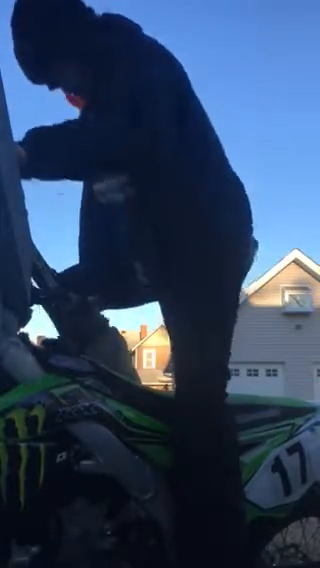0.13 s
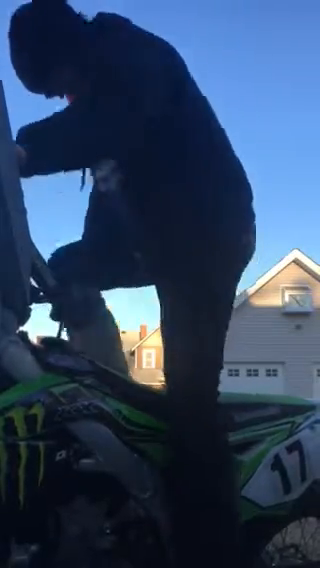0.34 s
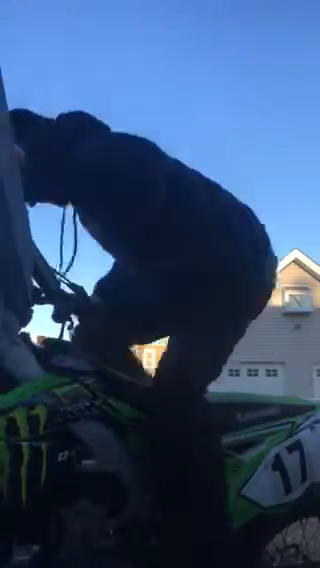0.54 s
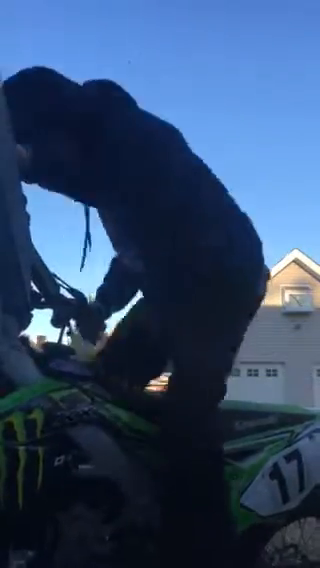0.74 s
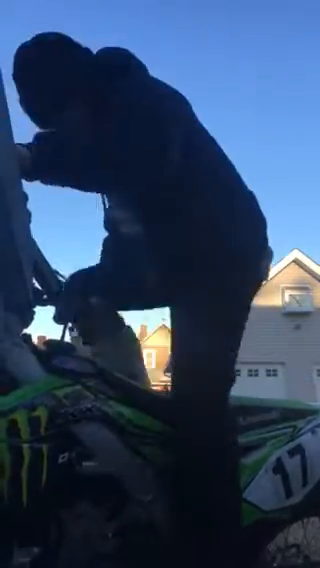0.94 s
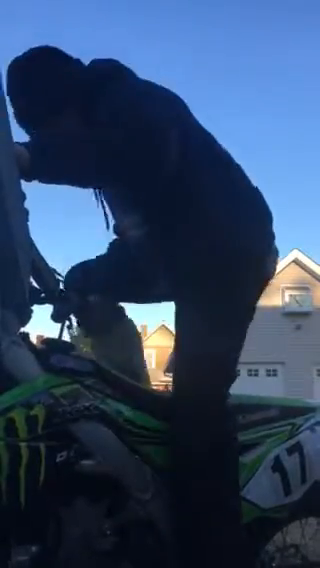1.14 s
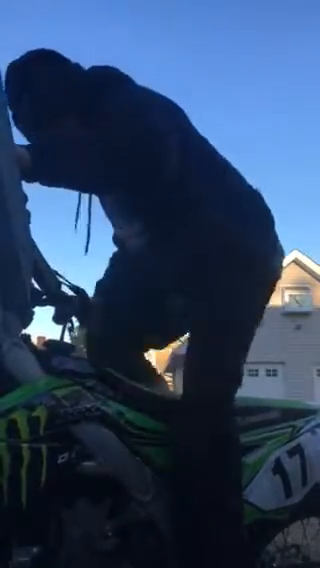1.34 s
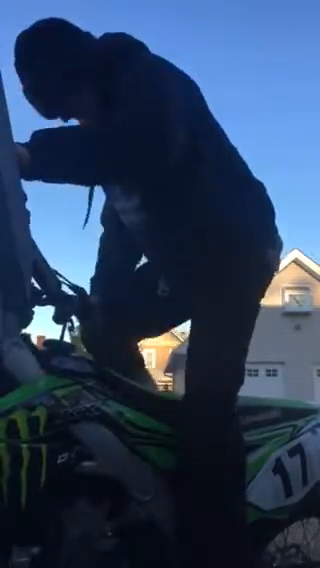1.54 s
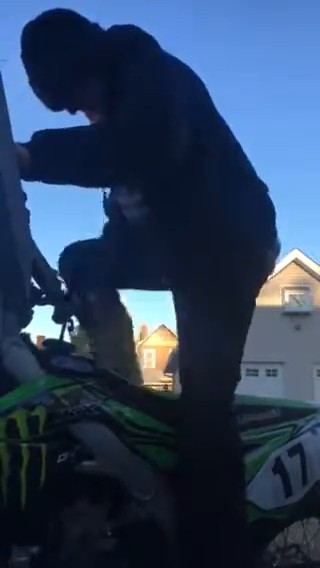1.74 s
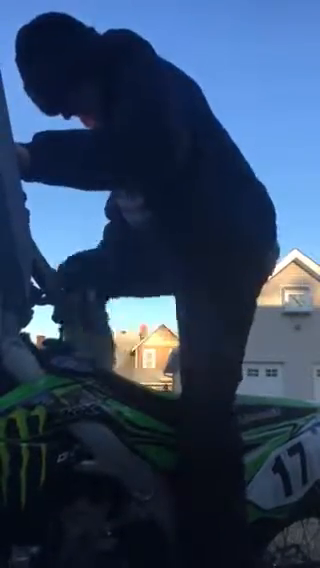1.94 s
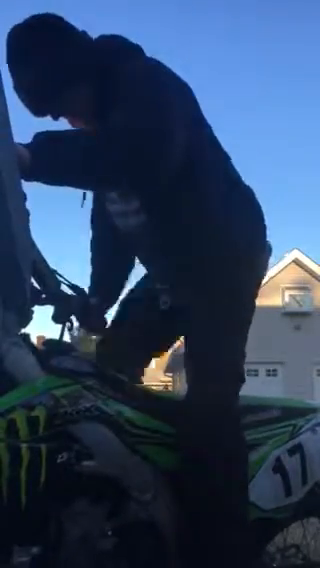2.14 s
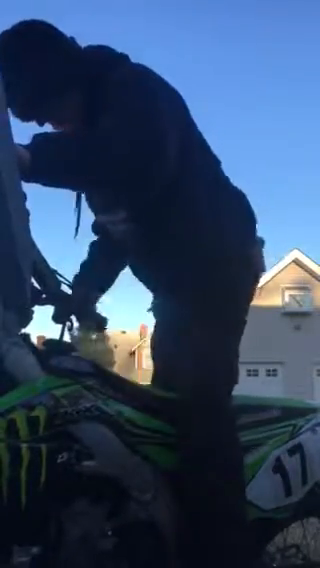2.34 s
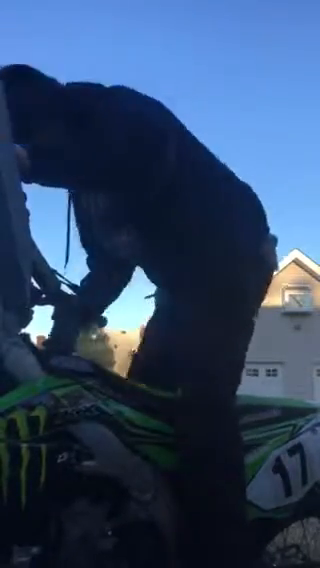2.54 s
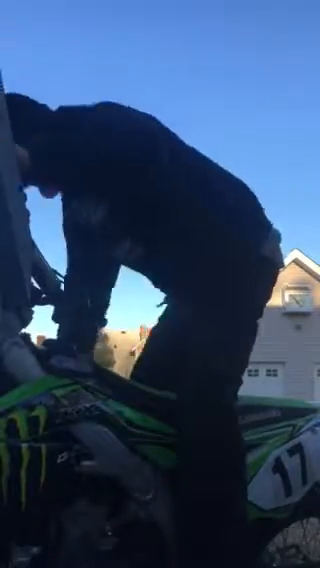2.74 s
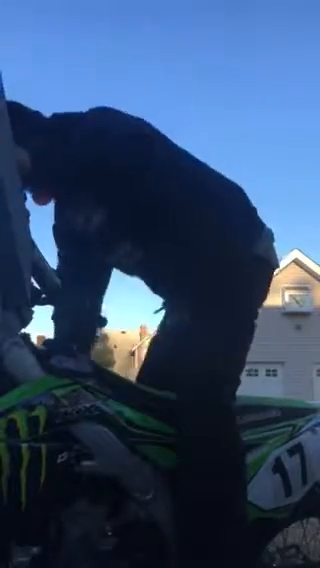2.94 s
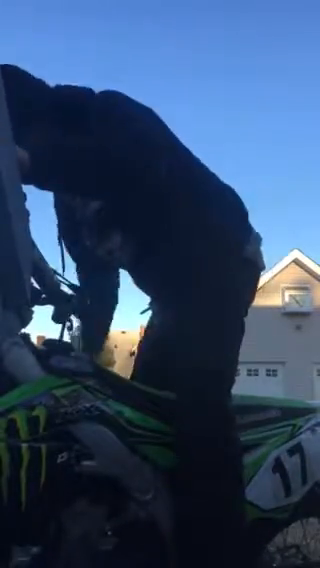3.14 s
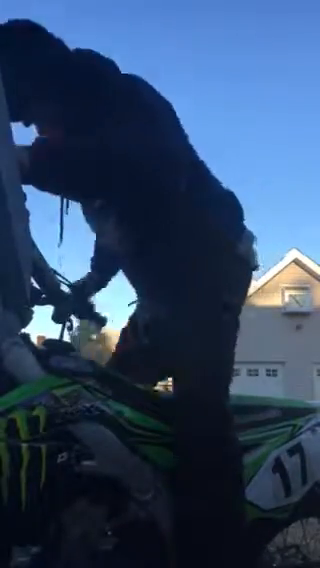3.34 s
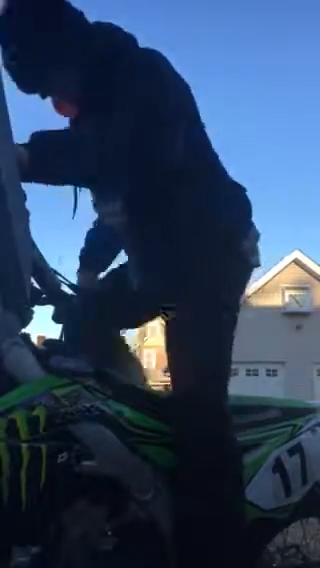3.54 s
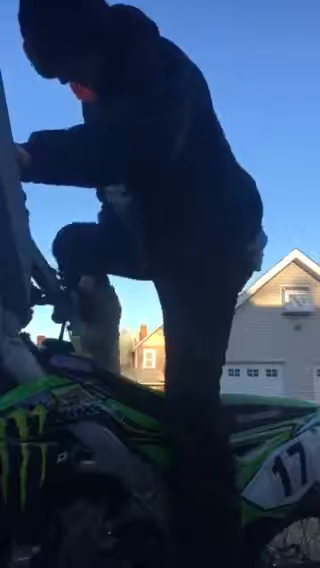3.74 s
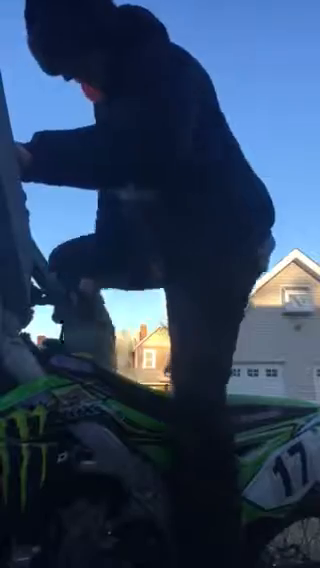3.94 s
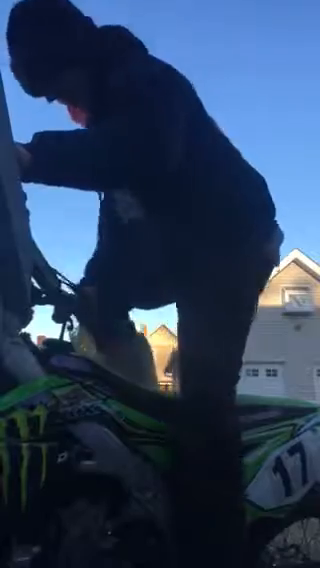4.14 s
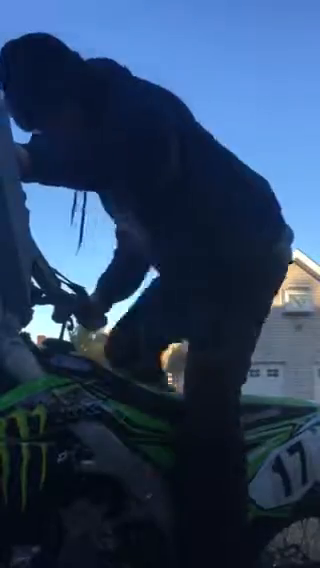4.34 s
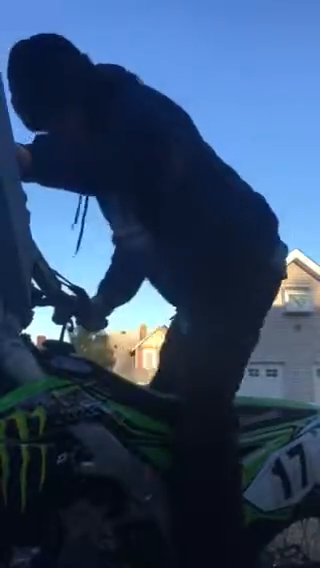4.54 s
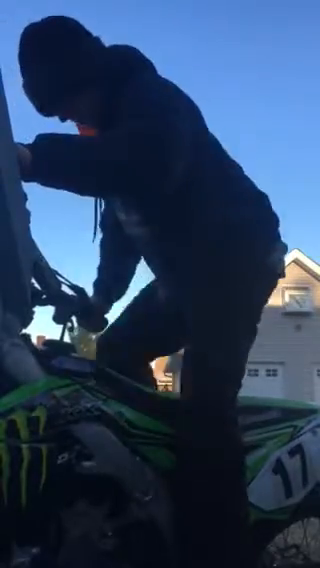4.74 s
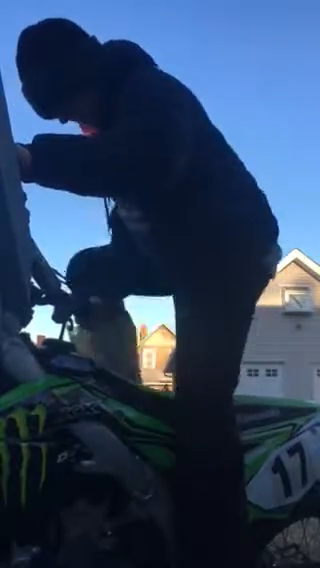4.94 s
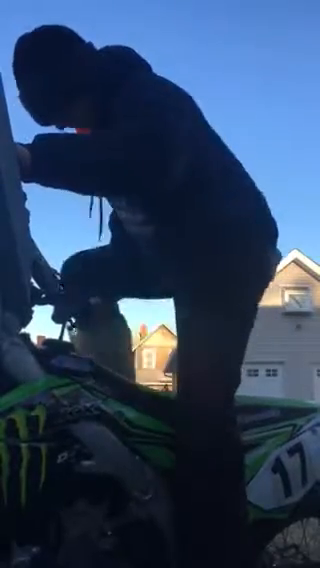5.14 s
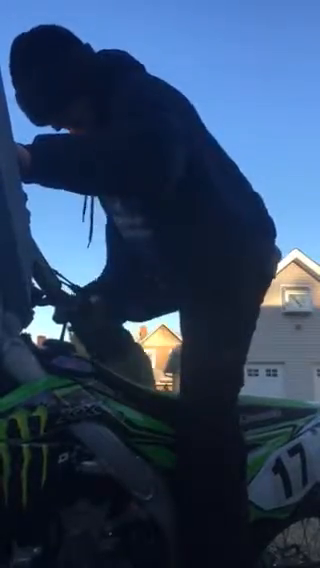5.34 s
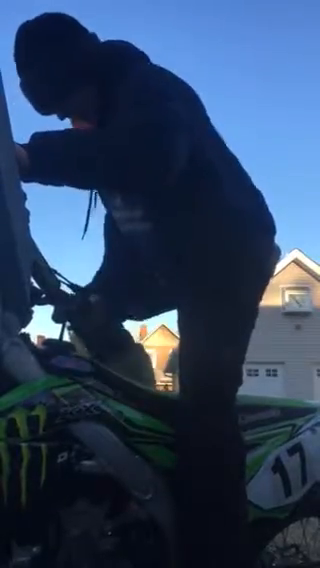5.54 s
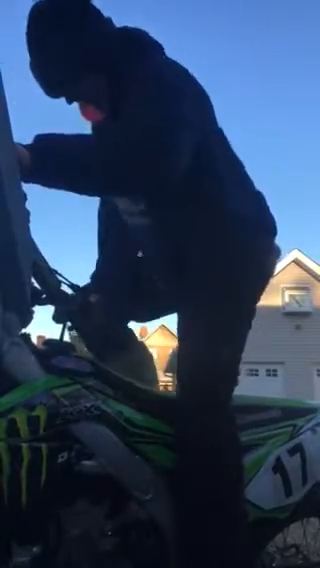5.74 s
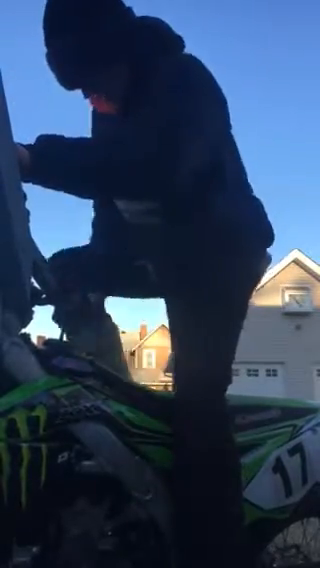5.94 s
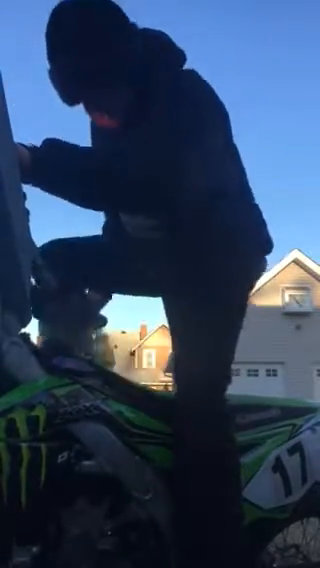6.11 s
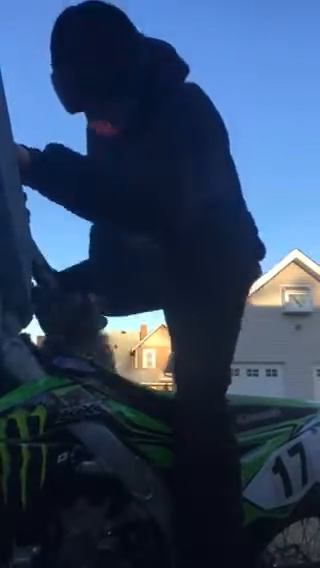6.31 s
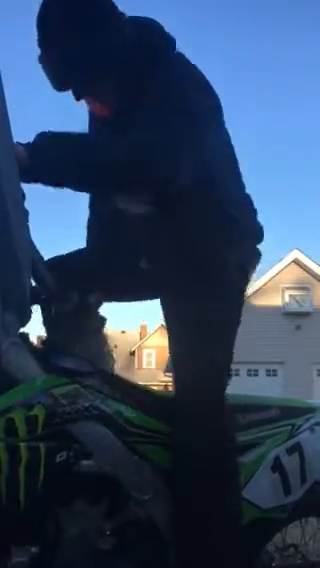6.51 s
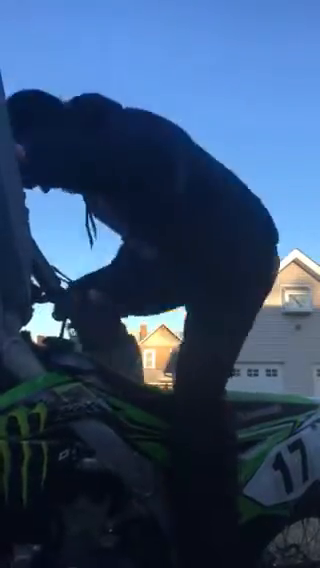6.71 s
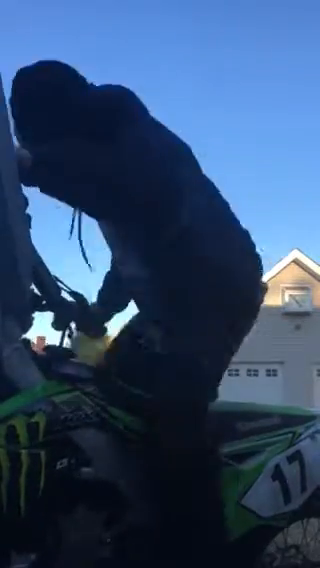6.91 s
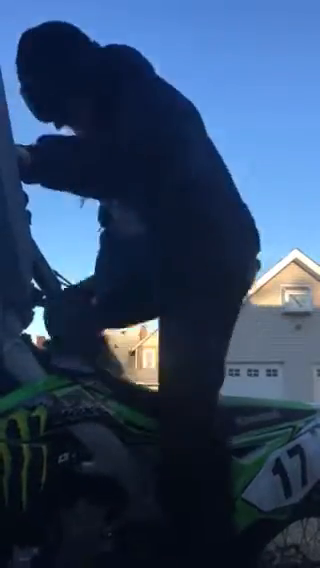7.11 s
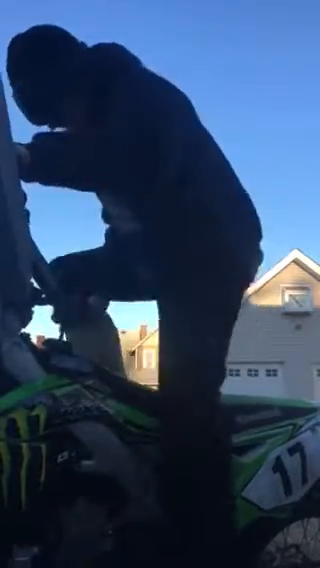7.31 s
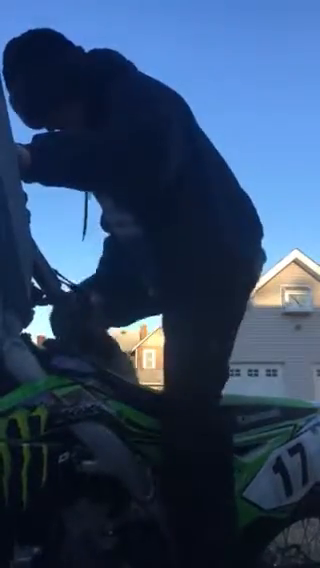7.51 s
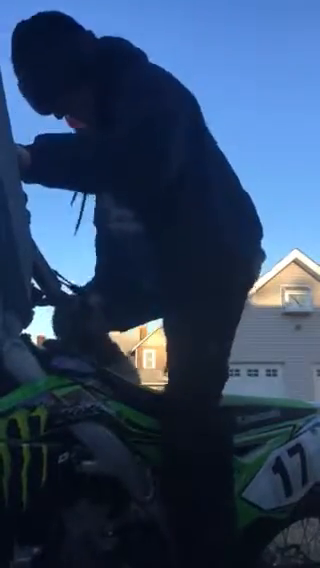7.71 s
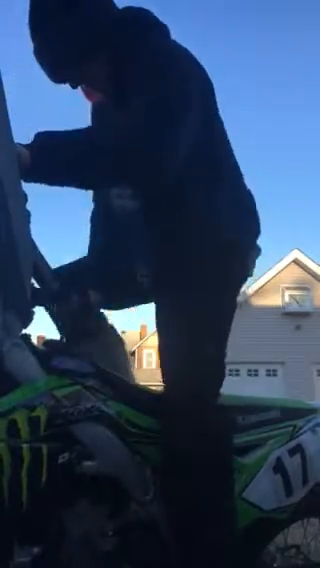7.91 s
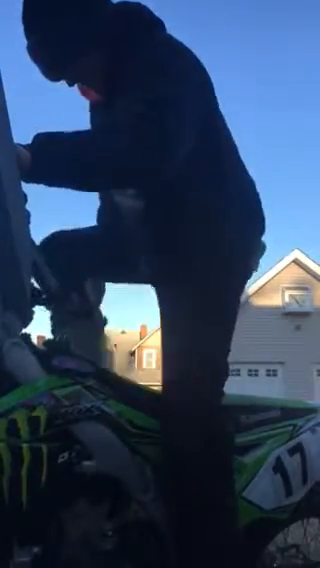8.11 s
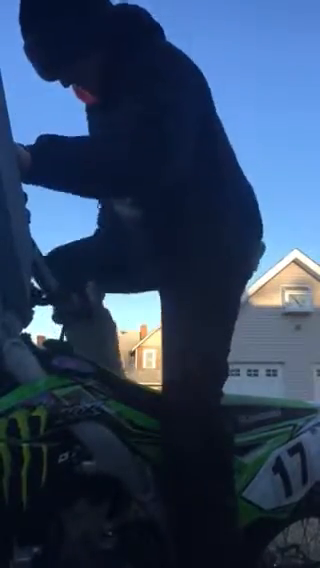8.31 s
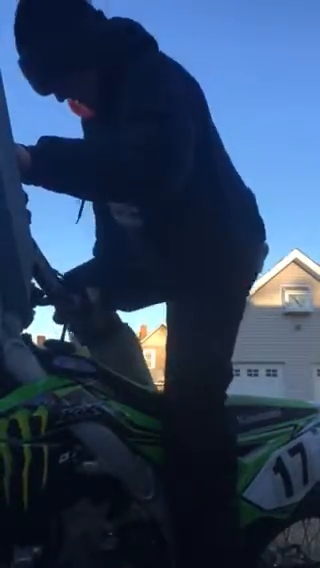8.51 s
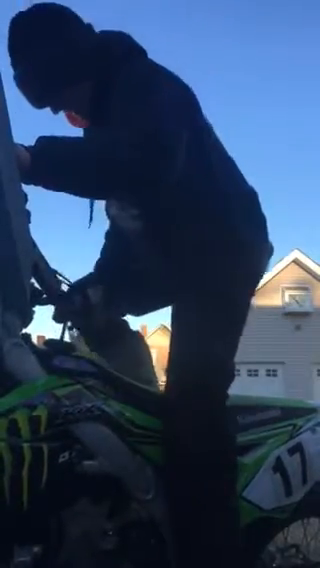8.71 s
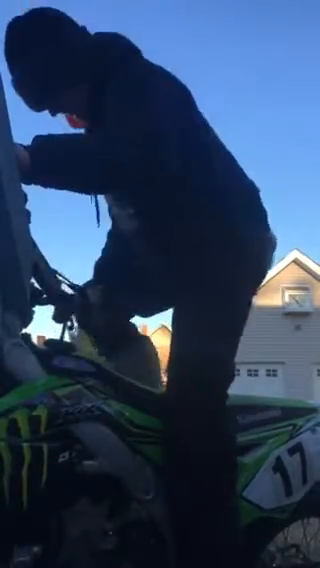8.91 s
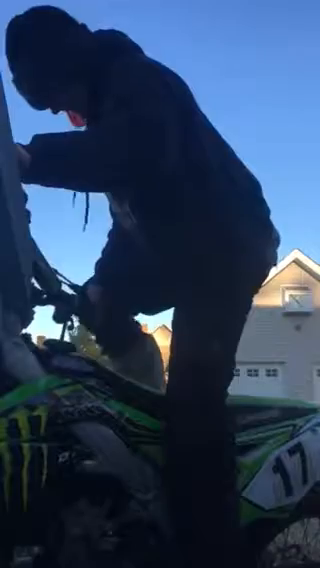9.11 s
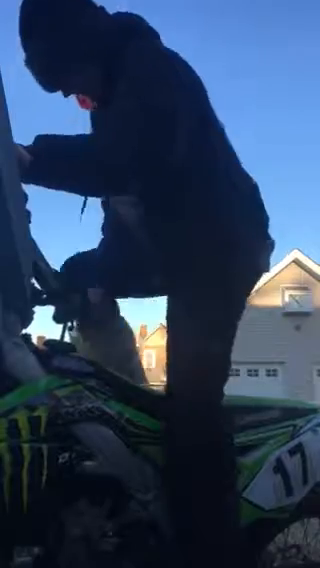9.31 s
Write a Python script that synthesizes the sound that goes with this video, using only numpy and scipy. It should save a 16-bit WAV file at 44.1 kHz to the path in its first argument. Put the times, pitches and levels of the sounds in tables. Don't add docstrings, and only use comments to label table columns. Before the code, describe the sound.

Metal lever, boot and frame knocks heard right beside a phone outdoors. First comes a loud clack and grinding gear spin with deep, soft pipe puffs; then fumbling, pings and cloth rustle; a softer kick midway with ratcheting return clicks; more fumbling; another loud full kick; then light rattles and scuffs. The engine never fires. Distant low traffic lies behind, and the space sounds open and dry.

```python
import sys
import numpy as np
from scipy import signal
from scipy.io import wavfile
from scipy.ndimage import uniform_filter1d

SR = 44100
rng = np.random.default_rng(int(sys.argv[2]) if len(sys.argv) > 2 else 0)


def bounce(signal):
    frames = np.transpose(np.atleast_2d(signal))
    limited = np.clip(frames, -1, 1)
    pcm = np.round(limited * 32767).astype(np.int16)
    wavfile.write(sys.argv[1], SR, pcm)


def volts_from_db(level):
    exponent = np.asarray(level, float) / 20
    return 10 ** exponent


N = 417185


def evened(x):
    return x / np.sqrt(np.mean(x ** 2) + 1e-20)


def add(mix, s, sound):
    part = mix[max(round(s * SR), 0):][:len(sound)]
    part += sound[:len(part)]


def band(x, lo_hz, hi_hz):
    return signal.sosfilt(signal.butter(3, [lo_hz, hi_hz], "band", fs=SR, output="sos"), x)


def resonate(x, hz, width_hz):
    return signal.lfilter(*signal.iirpeak(hz, hz / width_hz, SR), x)


def flicker(size, hz, depth_db):
    span = max(int(SR / hz), 1)
    slow = uniform_filter1d(rng.standard_normal(size), span)
    return volts_from_db(depth_db * evened(uniform_filter1d(slow, span)))


def sine(hz, t):
    return np.sin(2 * np.pi * hz * t)


def street():
    # f/Hz, level/dB per Hz
    spectrum = [(15, -44), (28, -31), (58, 2), (190, -14), (340, -20), (1700, -29.5), (2100, -34.5),
                (16000, -53.5)]
    frames, hz = N // 512 + 5, np.fft.rfftfreq(2048, 1 / SR)
    a, b, patches = rng.standard_normal((frames, 1025, 3)).T
    patches = evened(uniform_filter1d(uniform_filter1d(patches, 20, 0), 8, 1))
    f, db = np.transpose(spectrum)
    shape_db = np.interp(np.log(hz + 1), np.log(f + 1), db)[:, None]
    z = (a + 1j * b) * volts_from_db(shape_db + 0.5 * patches)
    return volts_from_db(-51) * evened(signal.istft(z, nperseg=2048, noverlap=1536)[1][:N])


def stir():
    # t/s, rustle level/dB
    restless = [(0.0, -58), (0.451, -54), (0.71, -40), (1.87, -55), (5.03, -50.5), (5.93, -56.5),
                (7.141, -43.5), (7.69, -51.5), (9.46, -59.5)]
    s, low_db = np.transpose(restless)
    bright_db = -59 + 1.73 * (low_db + 50)
    hum_db = -45 + 0.96 * (low_db + 50)
    t = np.arange(N) / SR
    low = band(rng.standard_normal(N), 95, 1610)
    low = evened(low + 2.5 * resonate(low, 310, 130)) * flicker(N, 30, 2.0)

    snap_size = volts_from_db(3.0 * np.minimum(rng.exponential(1, (3, N)), 2) - 4)
    snaps = snap_size * (rng.random((3, N)) < 45 / SR)
    grit = 0.49 + signal.oaconvolve(snaps, volts_from_db(-60 * t[None, :900] / 0.012), axes=1)[:, :N]
    edges_hz = (1700, 4500, 9000, 13600)
    bright = sum(band(rng.standard_normal(N) * g, lo, hi)
                 for g, lo, hi in zip(grit, edges_hz[:-1], edges_hz[1:]))
    bright = evened(bright) * flicker(N, 12, 2.8)

    hum = evened(resonate(resonate(rng.standard_normal(N), 78.0, 46), 67, 35))
    layers = ((low, low_db), (bright, bright_db), (hum, hum_db))
    return sum(v * volts_from_db(np.interp(t, s, db) - 6.0) for v, db in layers)


def scuff(s, length_s, db, hz):
    t = np.arange(0, 2 * length_s, 1 / SR)
    grain = rng.standard_normal(len(t)) * flicker(len(t), 150, 3.6)
    early, late = (evened(resonate(resonate(grain, k * hz, .25 * hz), k * hz, .25 * hz))
                   for k in (1.05, .95))
    share = t / t[-1]
    swell = np.sin(np.pi * share) ** 2
    return s - length_s, volts_from_db(db) * swell * ((1 - share) * early + share * late)


def scuffs(mix):
    # middle t/s, length/s, level/dB, f/Hz
    rubs = [(1.165, .025, -53, 4300), (1.222, 0.066, -52, 2150), (1.33, 0.072, -47.5, 990),
            (1.407, .07, -57, 1980), (2.395, 0.032, -43, 1500), (2.869, .18, -66, 5300),
            (3.8, 0.094, -63.5, 3500), (3.958, 0.068, -55.5, 900), (4.591, .03, -39.5, 1410),
            (5.391, 0.074, -54.5, 900), (6.82, 0.065, -41, 325), (7.508, .06, -56, 2300),
            (7.66, 0.05, -57, 1800), (8.066, 0.037, -49, 1100), (9.367, 0.046, -57, 1300),
            (9.428, 0.067, -49, 350)]
    for row in rubs:
        add(mix, *scuff(*row))


def tick(db, hz):
    t = np.arange(1800) / SR
    noise = rng.standard_normal(len(t))
    click = evened(band(noise, 1800, 8700) + 3.4 * band(noise, 0.67 * hz, 0.97 * hz))
    ring = np.interp(hz, [6000, 7500], [.2, .5]) * sine(hz, t)
    return volts_from_db(db + 11.5) * (click * volts_from_db(-60 * t / 0.0056) + ring * volts_from_db(-60 * t / .022))


def ticks(mix):
    # t/s, level/dB, strongest f/Hz
    touches = [(0.214, -42.5, 2180), (0.303, -48.5, 2400), (1.212, -41, 5470), (1.224, -50, 2190),
               (1.307, -42, 3600), (2.214, -51.5, 4430), (4.076, -44.5, 5300), (4.245, -53, 6540),
               (4.691, -44, 4700), (5.033, -44, 2300), (5.26, -41.5, 6080), (5.51, -53, 2830),
               (3.938, -49, 3630), (7.122, -27.5, 3880), (7.439, -45, 2140), (7.487, -43, 2530),
               (7.528, -42.5, 2180), (7.647, -45.5, 2420)]
    for s, db, hz in touches:
        add(mix, s, tick(db, hz))


def link(db, hz, t60_s, ring):
    t = np.arange(1500) / SR
    noise = signal.lfilter([1], [1, -.35], rng.standard_normal(len(t)))
    broad = band(noise, (0.31 + .5 * ring) * hz, 17000)
    click = evened(broad + 6 * ring * band(noise, .88 * hz, 1.12 * hz)) * volts_from_db(-60 * t / t60_s)
    return volts_from_db(db + 4) * (click + 0.82 * ring * sine(hz, t) * volts_from_db(-60 * t / 0.025))


def spring_pings(mix):
    # t/s, level/dB, f/Hz
    pings = [(1.351, -40, 9700), (1.67, -46, 12200), (2.39, -31, 12200), (2.579, -48, 12100),
             (2.62, -42.5, 7660), (3.02, -47.5, 10930), (3.15, -41, 11940), (4.531, -39, 10000),
             (4.566, -34, 11200), (5.142, -47, 11000), (6.272, -51, 12100), (6.542, -49, 11400),
             (7.004, -22, 10770), (7.601, -45, 11400), (7.719, -49.5, 12000), (8.21, -45, 8600),
             (8.833, -47, 12900), (8.951, -48.5, 11140)]
    for s, db, hz in pings:
        add(mix, s, link(db, hz, 0.0089, 0.53))


def chain_links(mix):
    # t/s, level/dB, strongest f/Hz
    links = [(0.05, -49, 6740), (0.474, -43, 5900), (0.526, -41, 5230), (0.999, -33, 11200),
             (1.111, -32.5, 11300), (1.12, -37.5, 6400), (1.335, -37, 7800), (1.444, -48, 6840),
             (1.556, -50, 7600), (1.601, -46, 11700), (1.642, -42, 7340), (1.712, -50, 10900),
             (1.807, -30, 8100), (2.283, -45, 11200), (2.642, -46, 12600), (2.932, -51, 6400),
             (3.525, -55.5, 12800), (3.698, -54, 5540), (4.266, -44, 6940), (4.351, -44, 11200),
             (4.618, -49, 7800), (4.681, -39.5, 7160), (4.813, -52, 7800), (5.092, -28, 11200),
             (5.537, -47, 5500), (5.921, -43.5, 11400), (5.974, -54, 7600), (6.013, -54, 6500),
             (6.093, -45, 5200), (6.197, -48, 9860), (6.547, -45, 4130), (6.624, -51, 12200),
             (6.696, -45, 8300), (6.734, -39, 7900), (6.787, -43, 12400), (7.242, -44, 10700),
             (7.274, -40, 9100), (7.473, -43, 11200), (7.558, -45, 12600), (7.617, -49, 6000),
             (7.712, -46, 4300), (7.774, -55, 11200), (8.181, -44, 6400), (8.19, -46, 12900),
             (8.516, -47, 7840), (8.778, -46, 5200), (8.894, -54, 4100)]
    for s, db, hz in links:
        add(mix, s, link(db, hz, 0.005, 0.43))


def boot_grit(mix):
    # t/s, level/dB
    grains = [(0.253, -57), (0.346, -58), (1.574, -55), (1.921, -54), (3.085, -55), (3.163, -51),
              (5.237, -54), (5.401, -50), (5.849, -59), (5.873, -55), (6.217, -53), (6.345, -57),
              (7.591, -50), (7.918, -55), (8.281, -56), (8.442, -59), (8.596, -61), (8.618, -52),
              (8.656, -53), (8.695, -52), (8.769, -54), (8.997, -60), (9.298, -62)]
    for s, db in grains:
        add(mix, s, link(db, rng.uniform(4000, 13000), 0.0104, 0.11))


def knock(peak_db, *part_db):
    # f/Hz, level/dB, t60/s
    cases = [(270, 10, 0.074), (294.4, -2, 0.23), (342.8, 2.5, 0.2), (428.7, 3.5, 0.14), (514, -8.5, 0.042)]
    frame = [(727, 3.5, 0.093), (800, 7.5, 0.074), (889, 0.5, 0.1), (1068, 7.5, 0.074),
             (1380, -17.5, 0.027), (1505, 17, 0.025)]
    lever = [(1746, 9, 0.051), (2180, -19, .05), (2300, 6.5, 0.072), (2590, 11, 0.042), (2830, -2.5, 0.021),
             (3600, -2, 0.082), (4160, 8.5, 0.03), (3880, 7.5, 0.034), (5600, -11.5, 0.027),
             (5860, -13.5, .04), (6900, -1, 0.033)]
    pawl = [(7600, -6, .035), (8750, -13, .03), (9900, -3, .045), (11100, -4, .035), (12350, -1, .05),
            (13600, -12, .03)]
    # low f/Hz, high f/Hz, rise/s, clatter t60/s, clatter against rings/dB, trim/dB
    parts = [
        (177, 557, 0.0051, 0.13, -0.5, -6.5),
        (594, 1764, 0.0015, 0.16, -4.5, -5),
        (1700, 6150, 0.00008, 0.14, -1.5, -5),
        (6400, 13700, 0.0011, 0.015, 3, -8.5),
    ]
    t = np.arange(6000) / SR
    hard = np.interp(peak_db, [-25, -18], [.02, 1])
    blow = hard * rng.standard_normal(1000) ** 3 * np.exp(-(t[:1000] / (0.0047 * hard)) ** 2)
    blow[0] += 22
    out = np.zeros(len(t))
    for modes, setting, db in zip((cases, frame, lever, pawl), parts, part_db):
        lo, hi, rise_s, t60_s, clatter_db, trim_db = setting
        over_lever_db = db - part_db[2]
        hz, mode_db, ring_s = np.transpose(modes)[:, :, None]
        if modes is frame:
            mode_db = mode_db - 0.69 * max(over_lever_db, 0) * np.log2(hz / 800)

        struck = rng.standard_normal((3, len(modes), 1))
        late = 1 - np.exp(-t * hz / 0.5)
        decay = volts_from_db(mode_db + 5.4 * struck[0] - 60 * t / ring_s)
        rings = late * decay * np.sin(2 * np.pi * hz * (1 + 0.013 * struck[1]) * t + 3 * struck[2])

        noise = signal.lfilter([1], [1, -.7], rng.standard_normal(len(t)))
        crack = 3.36 * volts_from_db(-60 * t / (0.12 * t60_s))
        walls = volts_from_db(-26 - 60 * t / .2)
        clatter = evened(band(noise, lo, hi)) * (crack + volts_from_db(-60 * t / t60_s) + walls)

        ring_db = -2.5 - 8 * hard
        if modes is pawl:
            ring_db = np.clip(-34.0 + 3.5 * over_lever_db, -14, 1.5)
        body = volts_from_db(ring_db) * rings.sum(0) / np.sqrt(len(modes) / 2) + volts_from_db(clatter_db) * clatter
        part = signal.fftconvolve(body * (1 - np.exp(-t / rise_s)), blow)[:len(t)]
        out += volts_from_db(peak_db + db + trim_db) * part / np.sqrt(np.mean(part[:660] ** 2))
    return out


def blows(mix):
    # t/s, lever level/dB, weight into the cases/dB, pawl jingle/dB
    stamp = [(2.376, -40.5, 16, 3), (2.665, -44, 4, -5), (3.371, -49, 18.5, -6), (6.181, -51, 6, -12)]
    boot = [(0.001, -49, 14, -10), (.389, -43, -2, 1.5), (.456, -47.5, -6.5, 1), (2.515, -51.5, 14, 0),
            (2.538, -43.5, 8.5, 10), (2.974, -46.5, -8, -22), (3.119, -46, -0.5, -12),
            (3.502, -52.5, 14, 15.5), (4.126, -40.5, 5, -39), (4.578, -43, 20.5, -22), (5.564, -45, 1.5, 2),
            (6.378, -43.5, -4, -31), (6.515, -50, 9, -4), (6.588, -43, -3, -6), (6.766, -45.5, 1, -15),
            (6.85, -35, 5, -3), (7.108, -29, 10.5, -15), (8.252, -41, 3, -6), (7.95, -63.5, 21, -16),
            (8.41, -54.5, -5, -21), (9.33, -47, 3, 1.5)]
    peg = [(.042, -47, -2, 1.5), (.205, -46, -15, -1), (.523, -50.5, -31, -19), (.632, -33.5, 7.5, -16),
           (.714, -16.5, -1, -2), (1.009, -41, -30, 7.5), (1.25, -31.5, -3, -26), (1.542, -44, -2, -2.5),
           (1.74, -41, -3.5, 6.5), (2.464, -47, 6, 4.5), (4.034, -34.5, -1.5, -0.5), (4.277, -47, -21, 16),
           (4.288, -49, 10, -22), (4.427, -52.5, 23, -7), (4.755, -48, -6, 12.5), (5.283, -32.5, -3, -35),
           (6.081, -43, -4.5, -11), (6.573, -41.5, -4, -3), (6.973, -22.5, 2.5, -16),
           (7.234, -40.5, -1, -10), (8.081, -40.5, -5, -26), (8.477, -37.5, 6.5, -23),
           (8.893, -49.5, -8, -10), (9.446, -53, 5, -7)]
    arm = [(.416, -42, -6, -1), (.561, -27, -0.5, -9.5), (.741, -22, -24, -19.5), (.767, -13.5, -4, -2.5),
           (.775, -15, -4.5, -1.5), (1.059, -38, -26, 7.5), (1.198, -42.5, -10, -4), (1.373, -46, 5, 8),
           (1.795, -35.5, -12.5, 7.5), (1.841, -36, -14, -13), (2.839, -46, -26, 13), (4.567, -49, -8, 13),
           (5.082, -40.5, -9, 12), (6.023, -32.5, -14, 6), (6.483, -58, 16.5, 19.5),
           (6.955, -13.5, -8.5, -2), (7.293, -32.5, -11, 5.5), (7.461, -43.5, 8.5, -17),
           (8.678, -44.5, -7, -2), (8.793, -47.5, -25, 9)]
    hinge = [(.682, -39.5, 12.5, 8.5), (.996, -49, 6, 9), (1.453, -53.5, -15, 16.5),
             (1.478, -51.5, -19, 10), (2.751, -48, -4, 4.5), (3.635, -44.5, -34, -35), (4.79, -52, -14, 16),
             (5.243, -44.5, -36, -17), (5.411, -51, 1, 15.5), (5.736, -62, 2.5, 22.5),
             (6.66, -46.5, -38.5, 3.5), (6.908, -39.5, 14.5, -2.5), (7.179, -43, -14, -24),
             (7.31, -51.5, -18, 25), (7.348, -45, -18, 6.5), (7.741, -49.5, -3, 0), (8.019, -35.5, -5, 6),
             (8.165, -55, 11, 6.5), (8.449, -44.5, -33, -2), (8.524, -35.5, -8.5, -0.5),
             (8.631, -58.5, -18, 13.5), (8.718, -49.5, -11, 8)]
    kinds = ((stamp, 10.8, 0.025), (boot, 4.3, 0.1), (peg, 0.92, .06), (arm, -1.7, 0.065),
             (hinge, -9.5, .05))
    for rows, frame_db, share in kinds:
        for s, db, weight_db, jingle_db in rows:
            add(mix, s, knock(db, weight_db, frame_db + share * weight_db, 0, jingle_db))


def lead(db, hz):
    t = np.arange(3500) / SR
    t60_s = np.interp(np.log(hz), np.log([300, 3000]), (0.054, 0.027))
    swell = 1 - np.exp(-t * hz / 2.5)
    rattle = .45 * evened(band(rng.standard_normal(len(t)), .8 * hz, 1.25 * hz))
    tone = np.sin(2 * np.pi * (hz * t + rng.random()))
    return volts_from_db(db + 4 - 60 * t / t60_s) * swell * (tone + rattle)


def leading_modes(mix):
    # t/s, peak/dB, f/Hz
    leads = [(.392, -34, 544), (0.561, -32, 1790), (.562, -27, 3870), (.632, -26.5, 1186),
             (0.638, -17, 268), (.716, -19, 777), (0.715, -32, 1800), (0.717, -18, 2870),
             (.739, -20.5, 1260), (0.769, -11.5, 960), (.776, -4.5, 322), (1.012, -41, 1440),
             (1.547, -38, 565), (1.842, -39, 1100), (2.466, -46.5, 4350), (2.515, -41, 730),
             (2.544, -33, 796), (2.668, -26.5, 657), (2.979, -45, 800), (3.121, -38, 2220),
             (3.233, -47.5, 1550), (3.266, -51, 2470), (3.373, -31, 960), (3.383, -25, 424),
             (3.973, -31, 332), (4.833, -35, 1700), (5.565, -48, 1110), (6.025, -29, 2220),
             (6.029, -30.5, 800), (6.188, -40.5, 794), (6.326, -47, 1340), (6.382, -38, 1540),
             (6.514, -38, 1960), (6.516, -30, 373), (6.877, -17.5, 263), (6.91, -28, 1650),
             (6.954, -23, 1530), (6.956, -18, 3060), (7.038, -27.5, 1790), (7.11, -23.5, 1700),
             (7.125, -28, 559), (9.331, -38, 1250)]
    for s, db, hz in leads:
        add(mix, s, lead(db, hz))


def ratchet(mix):
    # t/s, lever level/dB
    clicks = [(4.834, -29), (4.872, -31.5), (4.915, -29), (4.958, -31.5), (5.003, -31)]
    click_parts = (-16.5, -6.5, -3.5, 0.5)
    for s, db in clicks:
        add(mix, s, knock(db, *click_parts))


def gear_teeth(mix):
    # t/s, level/dB
    teeth = [(0.574, -32.5), (0.579, -27), (0.5962, -40.5), (0.623, -40), (0.6312, -35), (0.6505, -48),
             (0.6672, -38), (0.6833, -23), (0.6979, -29.5), (0.7962, -26.5), (0.8192, -33.5), (0.831, -35),
             (0.8394, -38), (0.8528, -29.5), (0.865, -30.5), (0.88, -32), (0.8932, -37), (0.9387, -44),
             (0.9618, -51.5), (6.841, -42), (6.855, -38.5), (6.8775, -37.5), (6.8947, -41.5),
             (6.9063, -36.5), (6.914, -35), (6.9312, -38), (6.9874, -30.5), (7.0044, -25), (7.018, -29.5),
             (7.0287, -29.5), (7.038, -26), (7.0497, -28), (7.0613, -27.5), (7.0708, -24.5), (7.0824, -27),
             (7.097, -27), (7.108, -26.5), (7.124, -31), (7.1452, -35)]
    for s, db in teeth:
        add(mix, s, link(db - 3.5, rng.uniform(5500, 10000), .018, .12))


def puff(s, peak_db, hz, length_s):
    t = np.arange(-2 * length_s, 3 * length_s, 1 / SR)
    swell = np.exp(-(t / np.where(t < 0, 0.28 * length_s, 0.42 * length_s)) ** 2)
    turn = 2 * np.pi * (hz * t + rng.random()) - 40 * t ** 2
    tone = np.sin(turn) + 0.11 * np.sin(2 * turn + 1.0) + 0.084 * np.sin(3 * turn)
    return s + t[0], volts_from_db(peak_db) * swell * tone


def exhaust_puffs(mix):
    # t/s of the top, peak/dB, f/Hz, length/s
    puffs = [(0.604, -29, 58, 0.0091), (0.651, -17, 69.4, 0.067), (0.754, -15, 80.6, 0.087),
             (0.836, -15.5, 71.5, 0.043), (0.928, -22.5, 75, 0.054), (0.965, -36, 83.6, 0.034),
             (1.329, -34.5, 78, 0.078), (1.981, -32.5, 66.5, 0.03), (4.203, -31.5, 63.5, 0.087),
             (4.266, -25.5, 124, 0.01), (4.423, -31, 68.5, 0.013), (4.53, -25.5, 76.4, 0.035),
             (4.573, -31, 82, 0.012), (6.359, -38.5, 79.3, 0.56), (6.873, -20, 69.6, 0.066),
             (6.917, -22, 77, 0.025), (6.968, -14, 80, 0.049), (7.006, -13, 80, 0.05),
             (7.066, -14.5, 73, 0.05), (7.158, -19.5, 78.4, 0.04), (5.55, -44.5, 87.6, 0.65)]
    for row in puffs:
        add(mix, *puff(*row))


def stroke(rows, shine_db, resonant, click, pitch):
    # f/Hz, width/Hz, level/dB
    gears = [(480, 70, 0), (1080, 120, -5), (1650, 70, 1), (2150, 100, -8), (3140, 120, -10),
             (4400, 160, -1), (5300, 300, -5), (6070, 250, -3), (7340, 250, -13), (9300, 200, -11),
             (11500, 200, -13)]
    s, frame_db = np.transpose(rows)
    top_db = frame_db.max()
    bright_db = top_db + shine_db + 1.56 * (frame_db - top_db)
    t = np.arange(s[0], s[-1], 1 / SR)
    size = len(t)
    effort_db = np.interp(t, s, frame_db)

    passed = np.floor(np.cumsum(95 * flicker(size, 30, 2.0)) / SR)
    skips = np.diff(passed, prepend=0) * rng.uniform(0.25, 1, size)
    jolts = 1 + click * signal.oaconvolve(skips, volts_from_db(-60 * np.arange(900) / SR / .012))[:size]
    teeth = rng.standard_normal(size) * flicker(size, 250, 2.8)
    broad = evened(signal.lfilter([1], [1, -.7], teeth * jolts))

    bite = volts_from_db(1.2 * (effort_db - top_db))
    rings = sum(volts_from_db(db) * flicker(size, 40, 2.5) * resonate(teeth, pitch * hz, w) * np.sqrt(100 / w)
                for hz, w, db in gears)
    whirr = .35 * broad + resonant * bite * rings
    low = evened(band(whirr, 160, 2510))
    high = evened(band(whirr, 2210, 17000) * jolts)
    sound = low * volts_from_db(effort_db) + high * volts_from_db(np.interp(t, s, bright_db))
    return s[0], sound * signal.windows.tukey(size, .1)


def kick_strokes(mix):
    # t/s, effort/dB
    strokes = [
        [(.565, -45), (.62, -42.5), (.67, -41), (.685, -38.5), (.75, -32.5), (.82, -39.5), (.89, -35.5),
         (.95, -54.5), (1.42, -51.5)],
        [(3.34, -72), (3.36, -45.5), (3.41, -47.5), (3.43, -72)],
        [(4.36, -49), (4.415, -45), (4.43, -41.5), (4.46, -39), (4.51, -42.5), (4.52, -44.5), (4.6, -48),
         (4.65, -51)],
        [(6.83, -38.5), (6.9, -43), (6.91, -35), (7.0, -35), (7.1, -37.5), (7.145, -41), (7.16, -45.5),
         (7.2, -43.5)],
        [(2.08, -75), (2.17, -61), (2.21, -81)],
        [(7.42, -47.5), (7.52, -49.5), (7.61, -50), (7.67, -47), (7.71, -61)],
        [(2.68, -61.5), (2.85, -60.5), (3.12, -79)],
    ]
    shine = [1.5, -9.5, 0, -0.5, 4.5, -10, 1]
    grips = [(.9, .15, 1), (.3, .5, 1), (4.5, .05, 1), (.8, .2, 1), (.15, .1, 1), (2.2, .6, .9),
             (2.2, .1, .69)]
    for rows, shine_db, grip in zip(strokes, shine, grips):
        add(mix, *stroke(rows, shine_db, *grip))


def scene():
    mix = street() + stir()
    for source in (scuffs, ticks, spring_pings, chain_links, boot_grit, blows, leading_modes,
                   ratchet, gear_teeth, exhaust_puffs, kick_strokes):
        source(mix)
    return mix[None]


def roll_off(x):
    return signal.sosfilt(signal.butter(12, 16820, fs=SR, output="sos"), x)


def record(dry):
    # f/Hz, width/Hz
    notches = [(4950, 500), (10600, 900)]
    dry = dry + volts_from_db(-93) * rng.standard_normal(dry.shape)
    for hz, width_hz in notches:
        dry = dry - .45 * resonate(dry, hz, width_hz)
    held = np.tanh(dry / 0.87)
    lowpass = signal.firwin(255, 16000, window=("kaiser", 6), fs=SR)
    edge = signal.oaconvolve(held, lowpass[None], "same")
    return roll_off(edge + volts_from_db(-21.5) * (held - edge))


dry = scene()
out = record(dry)
bounce(out)
```